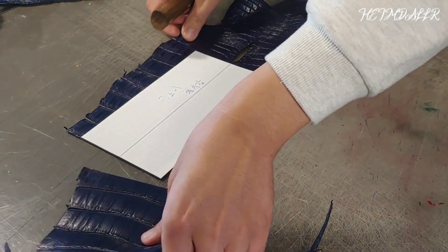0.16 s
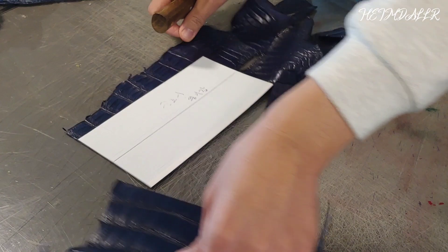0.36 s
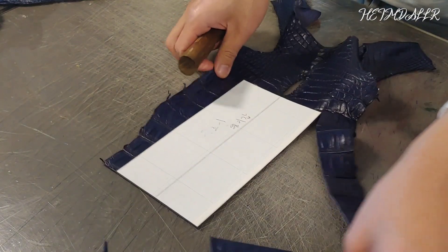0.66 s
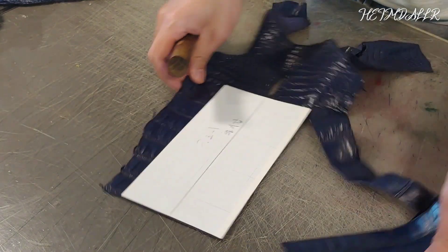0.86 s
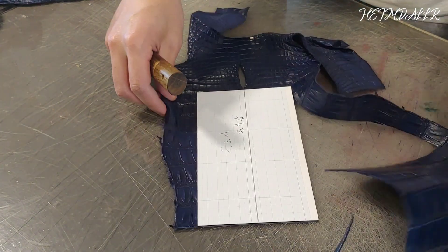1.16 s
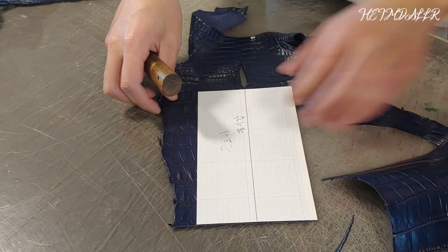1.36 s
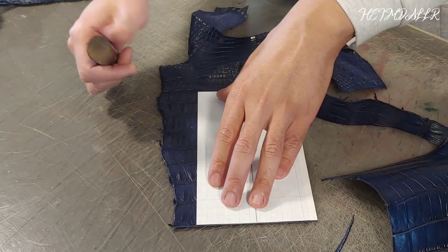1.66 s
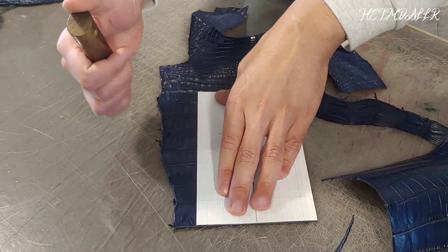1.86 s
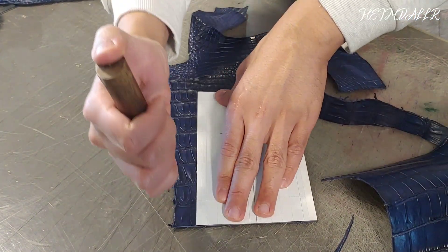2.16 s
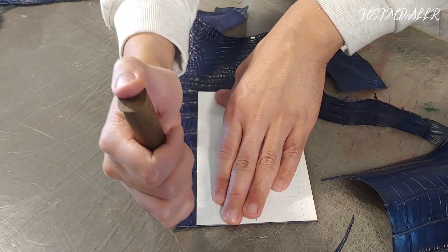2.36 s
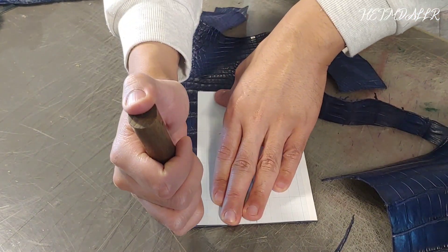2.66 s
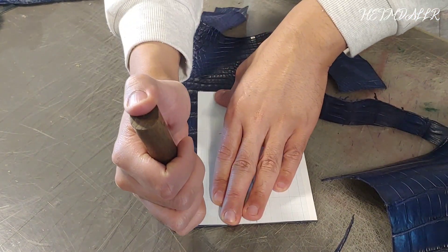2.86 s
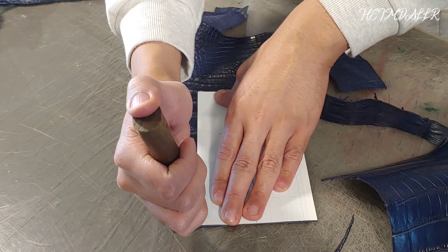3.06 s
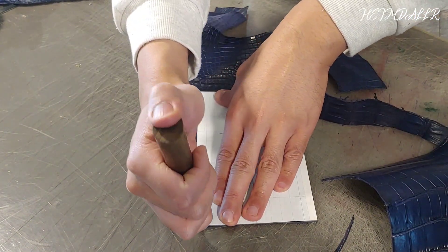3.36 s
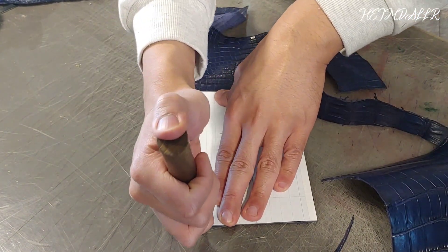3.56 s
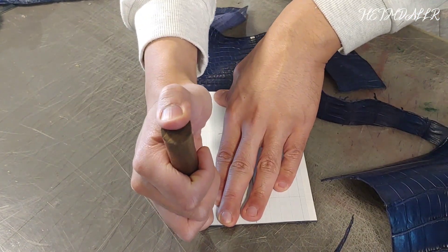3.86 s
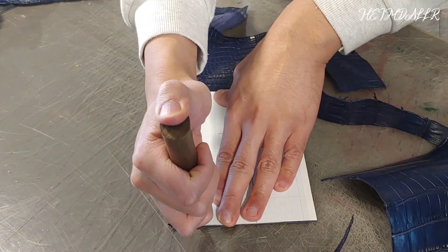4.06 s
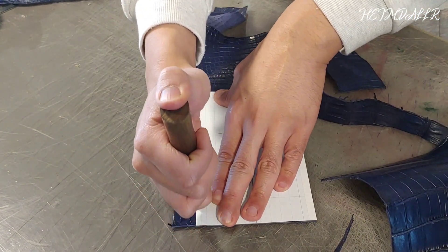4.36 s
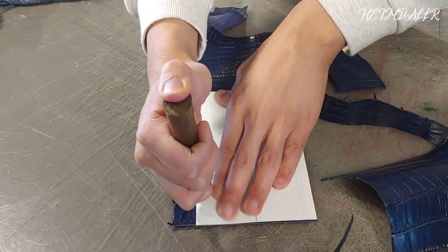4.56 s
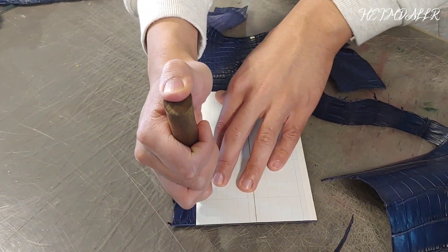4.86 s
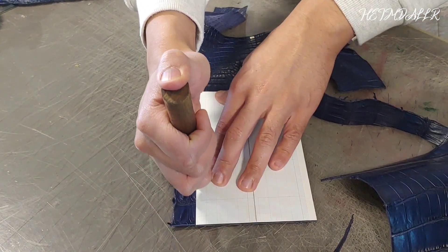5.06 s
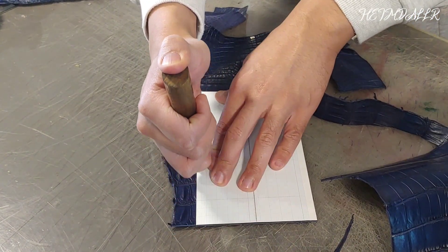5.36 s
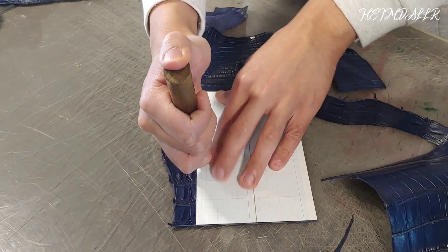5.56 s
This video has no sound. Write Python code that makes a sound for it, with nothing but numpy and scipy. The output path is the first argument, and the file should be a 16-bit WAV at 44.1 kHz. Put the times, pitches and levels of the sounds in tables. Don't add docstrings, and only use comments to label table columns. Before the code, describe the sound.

A small workshop, heard close up from a phone on the bench, work stronger on the right, with very faint air and machine hum. From 0 to 1.2 s hide and stiff card slide in dry, grainy rubs that grow stronger, with low bench booms and sharp clacks, loud at 0.6 and loudest near 0.83. A last short slide with a crack comes at 1.45-1.8. At 2.0-2.1 hands and handle land with deep hollow thumps, and again, softer, at 2.35, the panel ringing briefly. It is almost quiet until 3.3, then soft knocks, wooden creaks and tiny fibre ticks gather to 3.9. Around 4.1 the blade bites with small clicks and faint thin singing. At 4.8-4.9 a quick stutter of ticks leads to two bright snaps at 4.92 and 4.96 and a heavy low boom around 5.0. Light scraping, faint squeaks and small clicks finish by 5.6.

```python
import sys
import numpy as np
from scipy import signal
from scipy.fft import rfft, irfft, next_fast_len
from scipy.io import wavfile
from scipy.ndimage import uniform_filter1d, map_coordinates

SR = 44100
rng = np.random.default_rng(int(sys.argv[2]) if len(sys.argv) > 2 else 0)


def nominal_scale(level):
    x = np.asarray(level, float) / 20
    return 10 ** x


def wrap_up_sound(samples):
    columns = np.atleast_2d(samples).T
    tamed = np.clip(columns, -1, 1)
    steps = np.round(tamed * 32767).astype(np.int16)
    wavfile.write(sys.argv[1], SR, steps)


N = 251370

# (frequency [Hz], density [dB per Hz])
AIR = [(35, -15.5), (60, 8), (211, -5.5), (243, -7.5), (329, -32.5), (416, -13.5), (446, -13),
       (1240, -22.5), (1330, -20), (1570, -24.5), (1720, -20), (6510, -39.5), (7490, -53.5), (15800, -40.5)]
AIR_DB = -71.5
# (frequency [Hz], width [Hz], level [dB])
HUM = [(422, 5.3, -81), (420, 2.2, -76), (514, 27, -80)]
# (frequency [Hz], t60 [s])
SHOP = [(150, 0.89), (1000, 0.13), (2000, 0.34), (4800, 0.33), (8000, 0.2)]

# (frequency [Hz], level difference [dB])
NEAR_LEAN = [(60, -3), (200, -12), (400, -10), (700, -15), (1200, -15.5), (2400, -27), (4400, -9),
             (5900, -17), (7100, -75), (8600, -28), (10500, -1.5), (15000, -30)]
# (frequency [Hz], level difference [dB])
FAR_LEAN = [(60, -10), (180, -0.5), (550, 1.5), (1650, -5), (4970, 4.5), (15000, 1)]
# (frequency [Hz], share [0-1])
NEAR_ALIKE = [(60, 1), (150, 1), (300, 1), (1000, 0.53), (2500, 0.2), (8000, 0.44), (12000, 0.09)]
# (frequency [Hz], share [0-1])
FAR_ALIKE = [(60, 0.43), (300, 0.31), (700, 0.15), (1500, 0.041)]
LEFT_LEAD_S = 4.5e-5
# (frequency [Hz], level [dB])
PORT = [(100, -5), (7600, -3.5), (9300, -25.5), (11000, -16.5), (13000, -28), (16000, -37)]
BOUNCE_S, BOUNCE_DB = 0.0056, -12

# (time [s], level [dB], rise [ms], fall [ms])
BOOM = [(0.064, -44, 25, 82), (0.267, -58, 6.2, 55), (0.481, -46, 26, 11), (0.546, -56.5, 42, 56),
        (0.67, -57.5, 16, 43), (0.876, -45.5, 33, 2.9), (0.926, -45, 35, 13), (1.129, -51, 77, 25.5),
        (1.952, -36, 44, 25), (2.022, -38, 34, 25), (2.247, -50.5, 27, 42), (2.342, -44, 16, 57),
        (2.524, -57, 110, 64), (2.66, -49, 18, 68), (2.811, -51.5, 26, 24), (3.338, -62, 23, 26),
        (3.498, -57.5, 36, 30), (3.646, -56, 21, 51), (3.89, -43, 52, 69), (4.153, -51, 18, 10.6),
        (4.364, -49, 28, 11), (4.473, -52, 61, 26), (4.548, -47, 30, 20), (4.63, -52.5, 61, 25),
        (4.863, -46.5, 59, 4.6), (4.99, -34.5, 75, 42.5), (5.074, -45.5, 4.5, 82), (5.406, -45, 43, 13),
        (5.502, -45, 8.4, 52), (5.6, -45.5, 9.7, 43),
        (0.0, -53.5, 30, 45),
    (0.733, -56.5, 40, 62),
    (2.12, -45.5, 19, 27),
    (3.811, -50, 96, 11),
    (5.16, -52, 17, 140),
    (5.291, -50, 15, 45),
]
# (time [s], pitch [Hz])
LOAD = [(0.0, 126), (0.08, 130.9), (1.01, 134), (1.17, 113), (1.89, 116), (2.0, 135.8), (2.49, 119.5),
        (2.71, 132.5), (3.14, 112.8), (3.51, 130.8), (5.62, 132.9), (5.7, 123)]
BOOM_ROUND, BOOM_REST_DB = 2.2, -76
# (frequency [Hz], density [dB per Hz])
FRAME = [(13, -31.5), (22, -23.5), (43, -2), (81, -15.5), (100, -7.5), (130, -25), (220, -120)]
SWAY_REST_DB, SWAY_BOOM_DB, SWAY_RUB_DB, SWAY_S = -73.5, -17, -13.5, 0.2

# (time [s], pressure [dB])
STROKES = [
    [(0.0, -78), (.068, -77), (.19, -66.5), (.212, -58), (.232, -69), (.26, -74)],
    [(.26, -75.5), (.442, -60.5), (.584, -55), (.66, -71), (.74, -61.5)],
    [(.6, -58), (.68, -58.5), (.72, -66), (.755, -56.5), (.79, -58), (.83, -50.5)],
    [(.845, -53.5), (.87, -50.5), (.99, -45.5), (1.06, -48), (1.15, -51), (1.22, -74.5), (1.25, -67),
     (1.32, -88.5)],
    [(1.36, -82.5), (1.44, -66), (1.465, -55.5), (1.49, -59.5), (1.61, -62), (1.73, -54), (1.79, -65.5),
     (1.85, -82)],
    [(3.95, -99), (4.16, -75.5), (4.34, -77.5), (4.48, -78.5), (4.55, -96)],
    [(4.83, -100), (4.9, -68), (5.0, -63), (5.07, -69.5)],
    [(5.08, -77), (5.25, -75), (5.4, -70.5), (5.45, -79.5), (5.52, -102)],
]
# (card body [dB], brightness [dB], fine grit at full pressure [dB])
SURFACES = [(-16, -3, 1.5), (-15.5, -5.5, -1), (-6, -14.5, -10.5), (2, -5, -6), (-19.5, -7.5, -8),
            (-16, 0.5, 9.5), (-45, 4.5, 4), (-14, -2, 9.5)]
# (time [s], level [dB], rise [ms], fall [ms], grit [dB])
BRUSHES = [
    (1.91, -74.5, 61, 65, -5),
    (2.072, -61, 56, 22, 3.5),
    (2.348, -65, 24, 43, 4),
    (3.46, -73.5, 27, 49, -22),
    (3.89, -78.5, 130, 39, -6.5),
    (4.615, -64.5, 23.5, 16.4, 5.5),
    (4.73, -78.5, 76, 23, 4),
    (5.57, -68.5, 22, 78, 3),
]
# (hide rubs [dB], blade rubs [dB], touches [dB])
AIRY_DB = (-3, -2, 6.5)
GRIT_STAYS, LIFT_S = 0.19, 0.093
BRUSH_ROUND, BRUSH_CARD_DB, BRUSH_BRIGHT_DB, RUB_REST_DB = 1.76, -13, -2, -86.5
# (frequency [Hz], width [Hz], level [dB])
CARD = [(760, 80, -8), (880, 35, -2), (1010, 60, 1), (1065, 35, 0), (1210, 50, -5), (1325, 40, -5)]
# (frequency [Hz], density [dB per Hz])
RUB = [(560, -6.5), (1300, 0), (1460, 2), (1660, 6.5), (2020, 4), (2400, -1.5), (2770, -4), (5080, -18.5),
       (6000, -22.5), (7800, -42), (13200, -120)]
# (frequency [Hz], density [dB
# per Hz])
GRIT = [(3200, -24), (5500, -13), (6170, -12), (6620, 0), (7070, 5), (7330, 2), (7930, -10), (8600, -25),
        (9300, -21), (10500, -20), (12500, -19), (15500, -21), (15900, -60)]

HOLLOWS = [
    (320, [(.04, -76, 1943), (.055, -63, 1900), (.12, -67.5, 1584), (.22, -79, 1560), (.26, -82, 1590)]),
    (500, [(.17, -95, 3000), (.21, -57.5, 2950), (.24, -64, 2920)]),
    (380, [(.4, -71, 1700), (.46, -56, 1680), (.51, -70, 1640), (.56, -48, 1660), (.63, -87, 1680), (.67, -54, 1693), (.72, -76, 1690)]),
    (200.4, [(.5, -59.5, 1330), (.61, -62, 1267), (.68, -61, 1300), (.72, -68, 1290), (.75, -49.5, 1275), (.79, -64, 1266), (.82, -53, 1250), (.9, -47, 1200), (.95, -70, 1210)]),
    (257.6, [(.86, -51, 2350), (.91, -51.5, 2520), (.98, -49.5, 2400), (1.06, -52, 2285), (1.15, -67, 2445), (1.19, -78, 2440)]),
    (129, [(1.44, -60, 764), (1.47, -61, 775), (1.51, -59, 875), (1.56, -71.5, 850), (1.7, -89, 963), (1.78, -65, 934), (1.81, -86, 915)]),
    (380, [(1.44, -62, 2220), (1.47, -53, 2263), (1.54, -63, 2223), (1.62, -67.5, 2405), (1.73, -62, 2152), (1.8, -68, 2090), (1.84, -89, 2040)]),
    (450, [(3.425, -76, 1690), (3.455, -68.5, 1630), (3.48, -71, 1700)]),
]
PANEL = [
    (14.2, [(2.02, -50, 269.6), (2.06, -47, 305), (2.078, -44, 270.7), (2.095, -41, 313), (2.13, -57, 311), (2.21, -55, 294), (2.26, -70, 273)]),
    (12.1, [(2.34, -55, 294), (2.375, -50, 307), (2.395, -49, 310), (2.43, -57, 320), (2.49, -61, 330), (2.52, -62, 322)]),
    (19.8, [(2.33, -55, 510), (2.355, -43.5, 640), (2.4, -57, 654), (2.44, -65, 600), (2.5, -73, 609)]),
    (20, [(2.03, -62, 500), (2.06, -47, 643), (2.085, -53, 500), (2.102, -69, 510), (2.118, -59, 590), (2.14, -65, 595), (2.19, -74, 600)]),
    (30, [(5.4, -78, 487), (5.43, -62, 500), (5.45, -78, 500)]),
]
SING = [
    (45.3, [(4.08, -77, 2110), (4.14, -65, 2080), (4.2, -71, 2120), (4.27, -73, 2220), (4.295, -76, 2200), (4.322, -62.5, 2217), (4.36, -79, 2260), (4.4, -71.5, 2120), (4.5, -79, 2240)]),
    (30, [(4.22, -86, 2540), (4.265, -69, 2580), (4.33, -97, 2500), (4.39, -68, 2510), (4.43, -87, 2540), (4.47, -67, 2520), (4.51, -85, 2500)]),
    (110.2, [(5.04, -80, 2220), (5.12, -66, 2210), (5.18, -69, 2177), (5.22, -76, 2370), (5.27, -59.5, 2285), (5.34, -70.5, 2174), (5.44, -62.5, 2270), (5.49, -78, 2300)]),
    (110, [(5.24, -84, 1790), (5.3, -73, 1820), (5.385, -73, 1850), (5.43, -71, 1877), (5.5, -77, 1880), (5.52, -86, 1930)]),
    (50.6, [(5.18, -78, 830), (5.22, -68, 860), (5.28, -75, 900), (5.34, -68, 860), (5.41, -68, 922), (5.45, -71, 888)]),
    (425, [(5.266, -68, 3520), (5.285, -62, 3660), (5.345, -70, 3570), (5.37, -82, 3580)]),
]
STEADY_BLADE, STEADY_AIR, STEADY_PANEL = 0.5, 0, 2.4
SING_DB, AIR_POCKET_DB, PANEL_DB = -4, -2, -7

# (time [s], peak [dB], thud [dB])
CARD_CRACKS = [
    (.0495, -49, 0),
    (.0794, -40.5, -6.5),
    (.396, -51, -13),
    (.6107, -32.5, -12.5),
    (.744, -42, -15),
    (.835, -19, -13.5),
    (.9008, -32.5, -19),
    (1.4649, -30.5, -17),
]
# (time [s], peak [dB], thud [dB])
FIBRES = [(2.3346, -71, 21), (3.0499, -57, -11), (3.3874, -57, 5), (3.4346, -58, 12), (3.5876, -63.5, 9),
          (3.6336, -54.5, 9.5), (3.707, -56.5, 13), (3.7693, -60.5, 19), (3.7963, -52, 8), (3.8584, -56, 6),
          (3.8886, -51.5, 9), (4.5249, -57, 16), (5.4944, -52.5, 13.5), (5.5058, -48.5, 13)]
# (time [s], peak [dB], thud [dB])
STUTTER = [(4.7985, -39.5, 8.9), (4.821, -41.5, 9.3), (4.846, -39.5, 9.5), (4.8597, -43, 15),
           (4.8713, -44, 8.8), (4.8886, -42, 9.6), (4.8988, -48, 14)]
# (time [s], peak [dB], thud [dB])
NICKS = [
    (4.1035, -49, -1),
    (4.1367, -39, -1.5),
    (4.597, -54.5, 0),
    (4.6152, -48.5, -13),
    (4.7328, -64.5, -22),
    (4.909, -40, 12.5),
    (5.5555, -48.5, -17),
    (5.5762, -51, -23),
    (5.5923, -47, 1),
]
# (time [s], peak [dB], thud [dB])
SNAPS = [
    (.2036, -53, -18),
    (4.918, -20.5, -34),
    (4.964, -22.5, -10),
    (5.2719, -56, -10),
]
# (rows, snap [dB], edge [dB], ring t60 [ms])
CRACK_KINDS = [(CARD_CRACKS, -49, -52, 6.2), (FIBRES, -15, -12.5, 6.9), (STUTTER, -24, -11, 14.5),
               (NICKS, -10.5, 2.7, 7.9), (SNAPS, -1.8, -6, 8.6)]
CARD_HZ, BLADE_HZ, CUT_S = 1680, 2237, 4.0
# (time [s], peak [dB])
KNOCKS = [(3.316, -59), (3.345, -55), (3.387, -62), (3.42, -47), (3.442, -46.5), (3.589, -55), (3.635, -59),
          (3.696, -62), (3.707, -69), (3.735, -56), (3.768, -55), (3.783, -42), (3.818, -39), (3.859, -38.5),
          (3.988, -63),
          (2.025, -39),
    (2.081, -30.5),
    (2.323, -35.5),
    (2.333, -49),
]
KNOCK_DB = 38

# (time [s], level [dB], rise [ms], fall [ms], upper modes [dB])
PUSH = [(.06, -61, 43, 21, -11), (.33, -65.5, 85, 46, -2.5), (1.33, -82, 60, 72, -16),
        (1.68, -79, 98, 100, 12.5), (5.42, -58.5, 29, 32, 0.5), (0.459, -65, 47, 170, -6),
        (.84, -56, 14, 78, -1), (.91, -53, 14, 66, 2.5), (1.09, -68, 210, 280, -4),
        (1.469, -63, 44, 33, 9.5), (1.95, -62.5, 99, 77, -27), (2.08, -42, 41, 53, -6),
        (2.345, -42.5, 15.3, 44.5, 1), (2.481, -55, 27, 107, -16), (3.471, -56.5, 73, 30, 0),
        (3.79, -63, 25, 77, 6), (3.88, -51, 60, 47, 4.5), (4.135, -60.5, 35, 24, 3),
        (4.525, -60, 48, 54, -9), (4.62, -61, 31, 18, -4), (4.803, -60, 4.3, 110, 16.5),
        (4.915, -46.5, 32, 61, -4.5), (5.3, -65.5, 106, 39, 0), (5.505, -61.5, 22, 34, -3)]
PUSH_REST_DB = -79.5
# (frequency [Hz], width [Hz], level [dB])
LOW_MODES = [(196, 27.6, 3), (278.5, 29.2, -2), (307, 10.9, -3), (403.8, 34.1, -0.5)]
# (frequency [Hz], width [Hz], level [dB])
HIGH_MODES = [(504, 24.3, 1.45), (636, 50, -8), (760, 57, -11), (888, 27.4, -7.5), (942, 14, -10)]
# (time [s], peak [dB], pitch [Hz], t60 [ms])
RINGS = [(.3177, -50, 1480, 9.9), (.606, -45, 2590, 38), (.662, -49, 1800, 16), (.726, -48.5, 3840, 10),
         (4.821, -56, 3220, 19), (1.465, -46.5, 760, 45), (4.9185, -29, 7010, 9.3), (4.97, -33, 3330, 20),
         (4.971, -42, 4740, 15), (.455, -47, 2180, 28), (5.271, -46, 3450, 16), (5.272, -54, 3780, 27),
         (5.556, -54, 4750, 14), (5.564, -55, 4550, 16)]
# (time [s], peak [dB], pitch [Hz], t60 [ms])
THUMPS = [(2.019, -33.5, 212, 90), (2.03, -35, 226, 80), (2.081, -34.5, 257, 110), (2.331, -36.5, 474, 70),
          (2.356, -36.5, 304, 120), (2.382, -39, 450, 60), (2.39, -44.5, 309, 251), (3.785, -44, 500, 120),
          (3.818, -47, 500, 120)]
RING_RISE_CYCLES = 1


def unit(x):
    return x / np.sqrt(np.mean(x ** 2) + 1e-20)


def along(points, hz):
    f, v = np.transpose(points)
    return np.interp(np.log(hz + 1), np.log(f + 1), v)


def curves(rows):
    s, *cols = np.transpose(rows)
    return [np.interp(np.arange(N) / SR, s, c) for c in cols]


def wobble(rate):
    return map_coordinates(rng.standard_normal(int(N * rate / SR) + 4), [np.arange(N) * rate / SR])


def filtered(x, response):
    m = next_fast_len(N + SR // 2)
    return irfft(rfft(x, m) * response(np.fft.rfftfreq(m, 1 / SR)), m)[..., :N]


def modes(table):
    def response(f):
        total = 0
        for k, (hz, width, db) in enumerate(table):
            damping = 1j * f * width
            total = total + (-1) ** k * nominal_scale(db) * damping / (hz * hz - f * f + damping)
        return total
    return response


def colour(points):
    return lambda f: nominal_scale(along(points, f))


def tail(decays, seconds):
    hz, t, z = signal.stft(rng.standard_normal(int(SR * seconds)), SR, nperseg=256)
    h = signal.istft(z * nominal_scale(-60 * t / along(decays, hz)[:, None]), SR, nperseg=256)[1]
    return h / np.linalg.norm(h)


def grains(spiky_db, clump_db, rate):
    size_db = spiky_db * wobble(900) + clump_db * wobble(rate)
    return unit(rng.standard_normal(N) * nominal_scale(size_db))


def patchy(x, depth_db, bins, frames):
    z = signal.stft(x, nperseg=512)[2]
    field = uniform_filter1d(rng.standard_normal(z.shape), bins, 0)
    field = uniform_filter1d(field, frames, 1)
    return signal.istft(z * nominal_scale(depth_db * unit(field)), nperseg=512)[1][:N]


def swells(rows, roundness):
    s, db, rise_ms, fall_ms = np.transpose(rows)[:4, :, None]
    coarse = np.arange(0, N, 32)
    late_ms = 1000 * (coarse / SR - s)
    span_ms = np.clip(np.where(late_ms < 0, rise_ms, fall_ms), 2, None)
    steps = nominal_scale(db - 10 * (np.abs(late_ms) / span_ms) ** roundness)
    return np.array([np.interp(np.arange(N), coarse, row) for row in steps])


def together(gains, offsets_db, rest_db):
    weights = nominal_scale(2 * np.asarray(offsets_db) * np.ones(len(gains)))
    return np.sqrt(weights @ gains ** 2 + nominal_scale(2 * rest_db))


def pressure():
    return together(swells(BOOM, BOOM_ROUND), 0, BOOM_REST_DB)


def stroke(rows):
    return curves([(rows[0][0] - LIFT_S, -120), *rows, (rows[-1][0] + LIFT_S, -120)])[0]


def driven(rows, width_hz, steady):
    s, db, hz = np.transpose(rows)
    out, n = np.zeros(N), np.arange(int(s[0] * SR), int(s[-1] * SR))
    knots = rng.standard_normal((2, 200))
    real, imag = [map_coordinates(row, [(n - n[0]) * width_hz / SR], mode="wrap") for row in knots]
    phase = 2 * np.pi * np.cumsum(np.interp(n / SR, s, hz)) / SR
    edge = np.clip(np.minimum(n - n[0], n[-1] - n) / 150, 0, 1)
    tone = (steady + real) * np.sin(phase) + imag * np.cos(phase)
    out[n] = edge * nominal_scale(np.interp(n / SR, s, db)) * tone
    return out


def ports(x, other, lean, alike):
    share = lambda f: np.clip(along(alike, f), 0, 1)
    gain = lambda f: nominal_scale(along(lean, f))
    left = filtered(x, share) + filtered(other, lambda f: np.sqrt(1 - share(f) ** 2))

    def response(f):
        middle = 2 / np.sqrt(1 + gain(f) ** 2 + 2 * gain(f) * share(f))
        lead = np.exp(2j * np.pi * f * LEFT_LEAD_S)
        return middle * np.array([gain(f) * lead, f * 0 + 1])
    return filtered(np.array([left, x]), response)


def workshop():
    air = []
    for _ in range(2):
        breath = unit(filtered(rng.standard_normal(N), colour(AIR)))
        air.append(breath * nominal_scale(AIR_DB + 0.12 * wobble(4.8)))
    hum = np.zeros(N)
    for hz, width, db in HUM:
        hum += nominal_scale(db) * unit(filtered(rng.standard_normal(N), modes([(hz, width, 0)])))
    return ports(air[0] + hum, air[1], FAR_LEAN, FAR_ALIKE)


def boom():
    phase = 2 * np.pi * np.cumsum(curves(LOAD)[0] + 4 * wobble(25)) / SR
    rough = unit(filtered(rng.standard_normal(N), lambda f: modes([(135, 60, 0)])(f) ** 2))
    return nominal_scale(2.6) * pressure() * (np.sin(phase) + 0.18 * rough)


def rumble():
    rubs = sum(nominal_scale(2 * stroke(rows)) for rows in STROKES)
    drive = nominal_scale(2 * SWAY_BOOM_DB) * pressure() ** 2 + nominal_scale(2 * SWAY_RUB_DB) * rubs
    slow = np.abs(uniform_filter1d(drive, int(SWAY_S * SR)))
    level = np.sqrt(slow + nominal_scale(2 * SWAY_REST_DB)) * nominal_scale(0.79 * wobble(5))
    sway = [level * unit(filtered(rng.standard_normal(N), colour(FRAME))) for _ in range(2)]
    return ports(*sway, [(40, -5.0)], [(40, 0.73)])


def slide():
    force = patchy(grains(spiky_db=1.6, clump_db=1.3, rate=60), depth_db=2.5, bins=2, frames=8)
    upper = lambda f: 1 / (1 + (2700 / (f + 1)) ** 8)
    body = lambda f: modes(CARD)(f) / (1 + (700 / (f + 1)) ** 4) / (1 + (f / 1500) ** 4)
    card = unit(filtered(force, body))
    dull = unit(filtered(force, lambda f: colour(RUB)(f) * (1 - upper(f))))
    bright = unit(filtered(force, lambda f: colour(RUB)(f) * upper(f)))
    grit = unit(filtered(force, colour(GRIT)))
    fizz = filtered(grit, lambda f: 1 / (1 + (8900 / (f + 1)) ** 30))
    soft_fizz = filtered(fizz, lambda f: 1 / (1 + (f / 12300) ** 12))
    rub_fizz = np.where(np.arange(N) < CUT_S * SR, fizz, soft_fizz)

    rubs_db = np.array([stroke(rows) for rows in STROKES])
    drop_db = np.clip(rubs_db.max(axis=1, keepdims=True) - rubs_db, 0, 25)
    touches = swells(BRUSHES, BRUSH_ROUND)
    gains = np.vstack([nominal_scale(rubs_db), touches])
    gritty_rubs = nominal_scale(rubs_db + GRIT_STAYS * drop_db)
    gritty = np.vstack([gritty_rubs, touches])

    card_db, bright_db, rub_grit_db = np.transpose(SURFACES)
    touch_grit_db = np.transpose(BRUSHES)[4]
    with_touches = lambda rub_db, touch_db: np.append(rub_db, touch_db * np.ones(len(BRUSHES)))
    card_db = with_touches(card_db, BRUSH_CARD_DB)
    bright_db = with_touches(bright_db, BRUSH_BRIGHT_DB)
    grit_db = with_touches(rub_grit_db, touch_grit_db)
    airy_db = [AIRY_DB[1] if rows[-1][0] > CUT_S else AIRY_DB[0] for rows in STROKES]

    out = together(gains, 0, RUB_REST_DB) * dull
    out += together(gains, card_db, RUB_REST_DB - 15.0) * card
    out += together(gains, bright_db, RUB_REST_DB + 1.0) * bright
    out += together(gritty, grit_db, RUB_REST_DB - 6.0) * (grit - fizz)
    out += together(gritty_rubs, rub_grit_db + airy_db, -120) * rub_fizz
    out += together(touches, touch_grit_db + AIRY_DB[2], -120) * soft_fizz
    return nominal_scale(-2.5) * out


def hollows():
    air = sum(driven(rows, width_hz, STEADY_AIR) for width_hz, rows in HOLLOWS)
    panel = sum(driven(rows, width_hz, STEADY_PANEL) for width_hz, rows in PANEL)
    return nominal_scale(AIR_POCKET_DB) * air + nominal_scale(PANEL_DB) * panel


def wood(f):
    return (modes(LOW_MODES)(f) + 1.08 * modes(HIGH_MODES)(f) + 0.04) / (1 + 1j * f / 1100) ** 2


def ring(t, hz, db, t60):
    turns = hz * (1 + 0.019 * rng.normal()) * t + rng.random()
    return nominal_scale(db - 60 * t / t60) * np.sin(2 * np.pi * turns)


def crack(t, s, snap_db, edge_db, t60):
    out = ring(t, CARD_HZ if s < CUT_S else BLADE_HZ, 0, t60)
    if s > CUT_S:
        out += ring(t, 1830, -6.5, t60)
    out += ring(t, 3260, snap_db + 9.5, 0.63 * t60)
    out += ring(t, 4510, snap_db + 2.5, 0.0044)
    out += ring(t, 3700, snap_db - 10, 0.0023)
    out += ring(t, 3560, snap_db + 1, 0.0031)
    out += ring(t, 5250, snap_db - 18, 0.0018)
    out += ring(t, 12700, snap_db - 20, 0.0026)
    out += ring(t, 7030, edge_db + 8.5, 0.0059)
    scatter = 0.26 * rng.standard_normal(len(t)) * nominal_scale(-60 * t / 0.011)
    return out + scatter * (0.043 + nominal_scale(edge_db + 14.0))


def ticks():
    out, blows, t = np.zeros(N + SR), np.zeros(N), np.arange(SR // 30) / SR
    rise = 1 - np.exp(-(t / 0.00046) ** 2)
    for rows, snap_db, edge_db, ring_ms in CRACK_KINDS:
        for s, db, thud_db in rows:
            sound = rise * crack(t, s, snap_db, edge_db, ring_ms / 1000)
            out[round((s + 0.0004) * SR):][:len(t)] += nominal_scale(db + 2.5) * sound
            out[round((s + 0.0009) * SR)] += nominal_scale(db + snap_db + 10)
            blows[round((s + 0.0006) * SR)] = nominal_scale(db + thud_db + 32.0)
    bounce = lambda f: 1 + nominal_scale(BOUNCE_DB) * np.exp(-2j * np.pi * f * BOUNCE_S)
    return filtered(out[:N], lambda f: colour(PORT)(f) * bounce(f)) + filtered(blows, wood)


def knocks():
    blows = np.zeros(N)
    for s, db in KNOCKS:
        blows[round(s * SR)] = nominal_scale(db + KNOCK_DB)
    return -filtered(blows, lambda f: wood(f) / (1 + 1j * f / 900) ** 2)


def groan():
    gains = swells(PUSH, 0.93)
    slips = (rng.random(N) < 160 / SR) * nominal_scale(2.67 * rng.standard_normal(N))
    force = nominal_scale(21.5) * (unit(slips) + 0.61 * grains(spiky_db=4.5, clump_db=0.0, rate=79))
    low = lambda f: modes(LOW_MODES)(f) * (1j * f / (1j * f + 150)) ** 2
    high = lambda f: modes(HIGH_MODES)(f) / (1 + 1j * f / 1100) ** 2
    lower = together(gains, 0, PUSH_REST_DB)
    upper = together(gains, np.transpose(PUSH)[4], PUSH_REST_DB - 7.5)
    return filtered(lower * force, low) + filtered(upper * force, high)


def flicks():
    out, t = np.zeros(N + SR), np.arange(SR // 8) / SR
    for s, db, hz, t60_ms in [*RINGS, *THUMPS]:
        swell = 1 - np.exp(-t * hz / RING_RISE_CYCLES)
        decay = nominal_scale(db - 60000 * t / t60_ms)
        out[round(s * SR):][:len(t)] += decay * swell * np.sin(2 * np.pi * hz * t)
    return out[:N]


def blade():
    return nominal_scale(SING_DB) * sum(driven(rows, width_hz, STEADY_BLADE) for width_hz, rows in SING)


def scene():
    contacts = ticks() + knocks()
    echo = signal.fftconvolve(np.pad(contacts, (260, 0)), tail(SHOP, 0.17))[:N]
    near = boom() + slide() + hollows() + contacts + groan() + flicks() + blade() + nominal_scale(-11) * echo
    detour = signal.fftconvolve(near, tail([(200, 0.12), (1000, 0.04), (8000, 0.012)], 0.1))[:N]
    return ports(near, detour, NEAR_LEAN, NEAR_ALIKE) + rumble() + workshop()


def roll_off(x):
    return signal.sosfilt(signal.butter(12, 16490, fs=SR, output="sos"), x)


def record(dry):
    return roll_off(dry)


dry = scene()
out = record(dry)
wrap_up_sound(out)
```